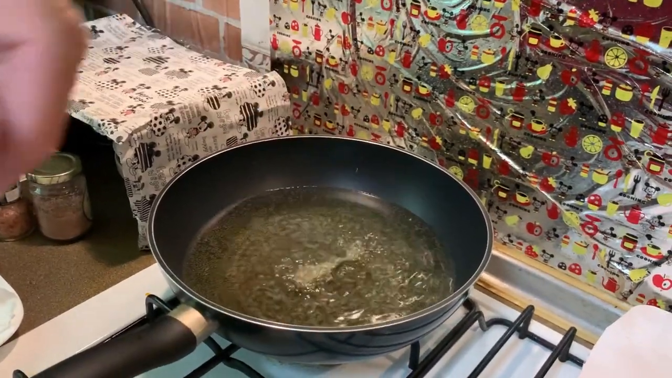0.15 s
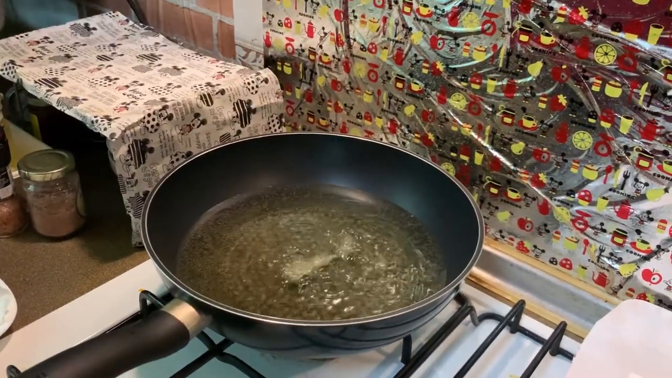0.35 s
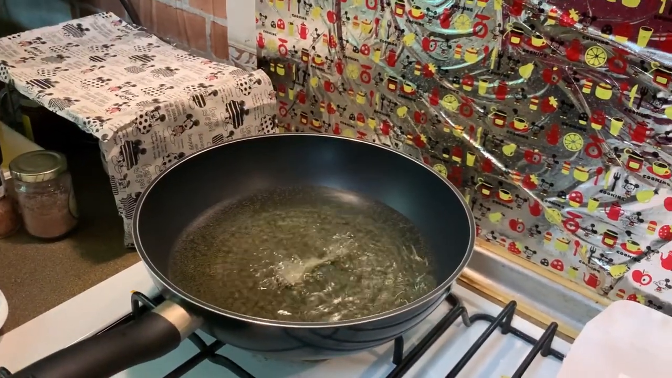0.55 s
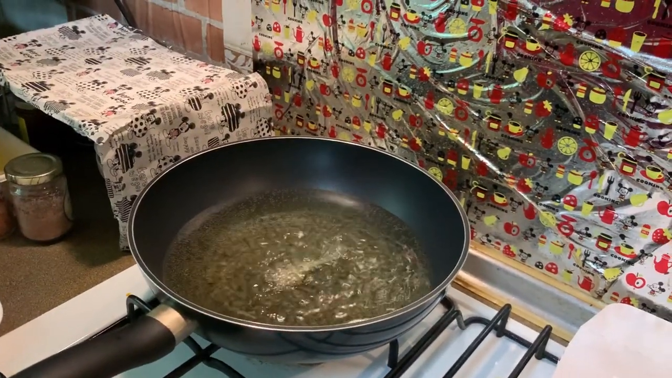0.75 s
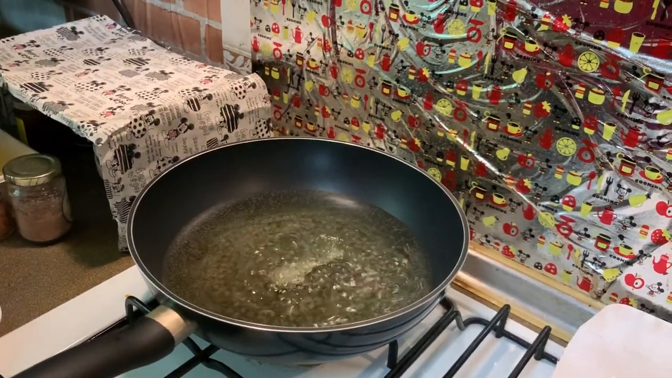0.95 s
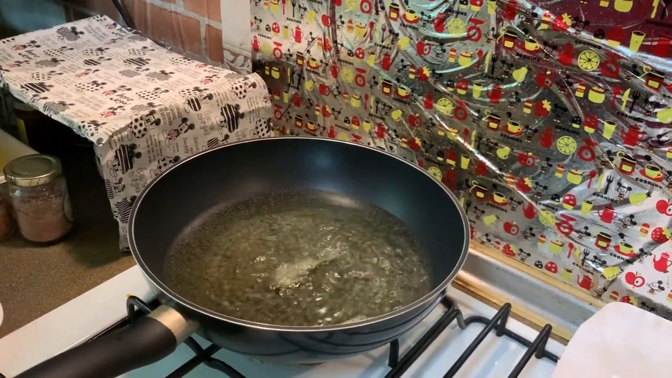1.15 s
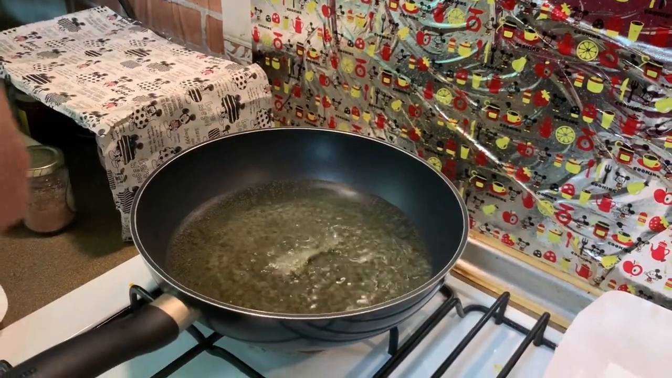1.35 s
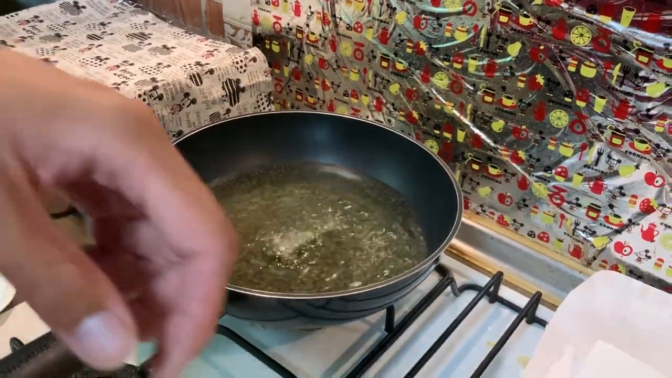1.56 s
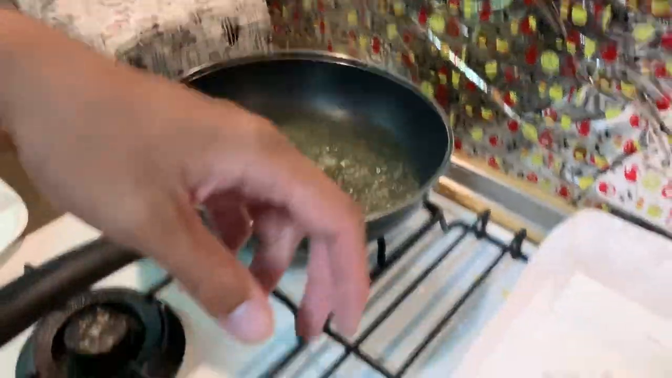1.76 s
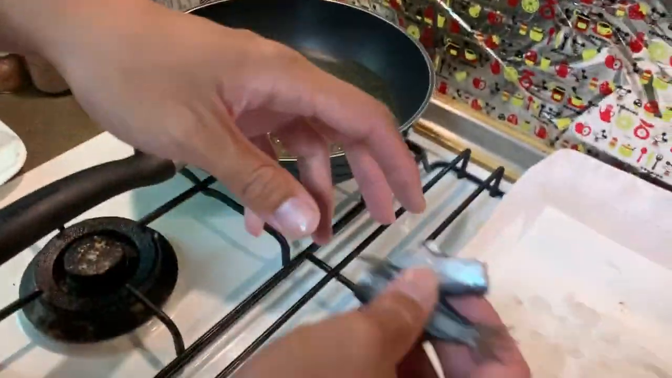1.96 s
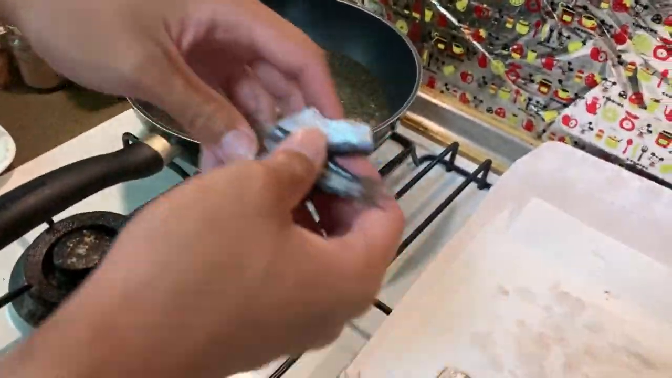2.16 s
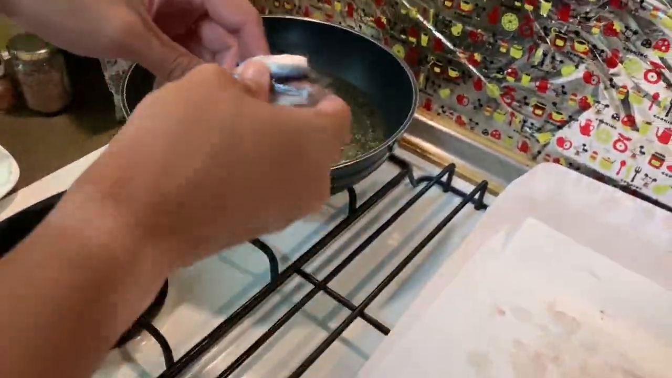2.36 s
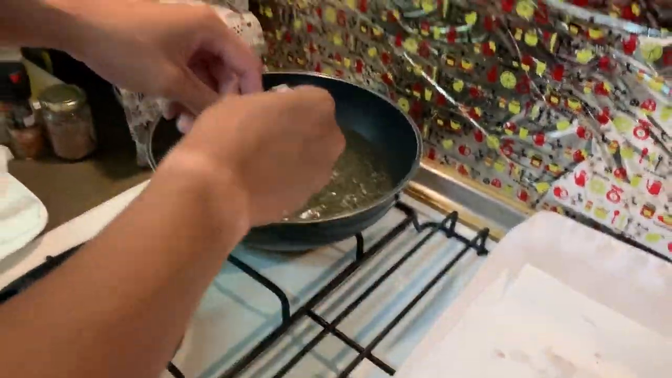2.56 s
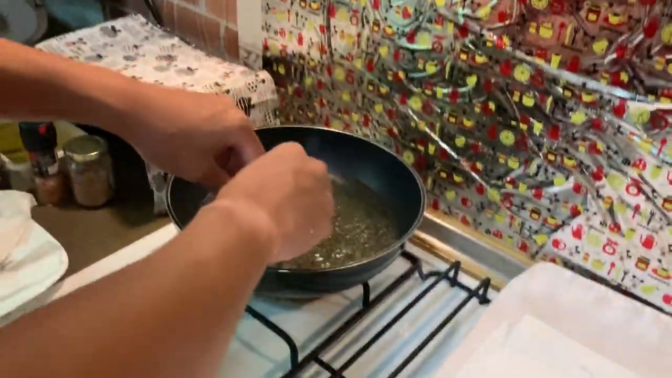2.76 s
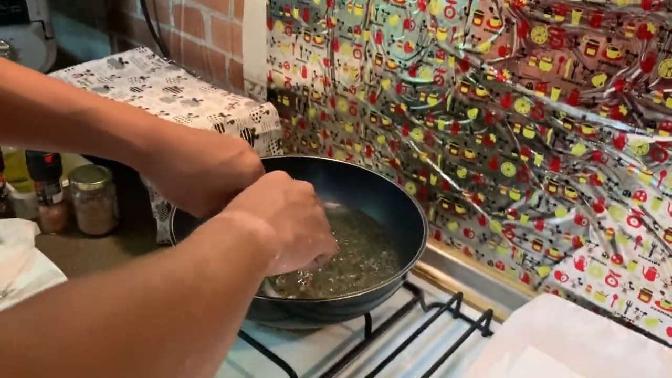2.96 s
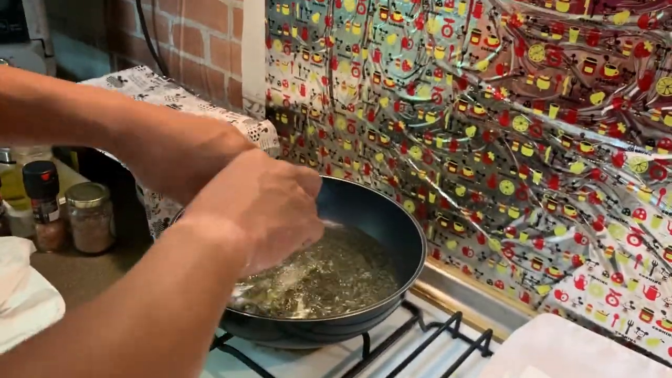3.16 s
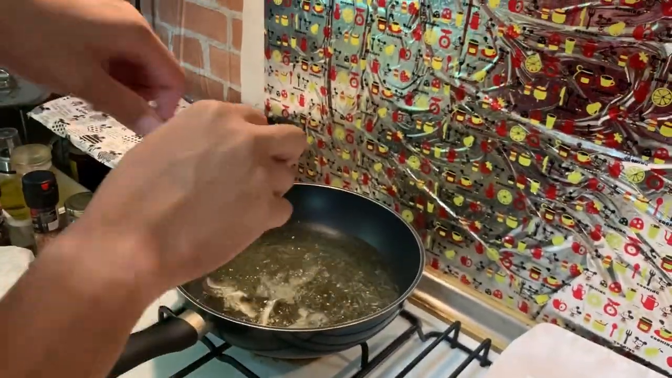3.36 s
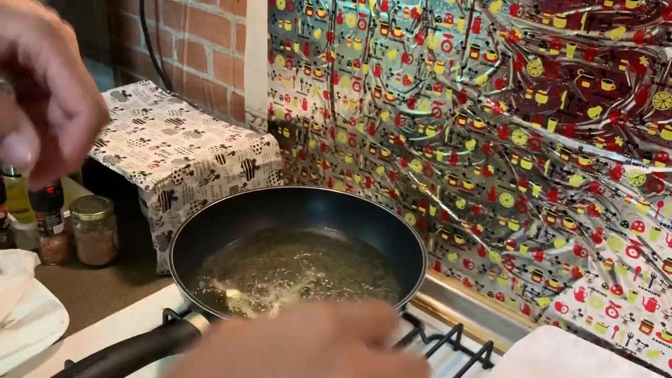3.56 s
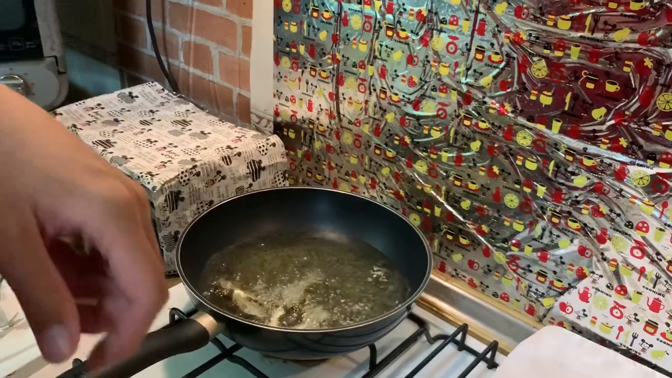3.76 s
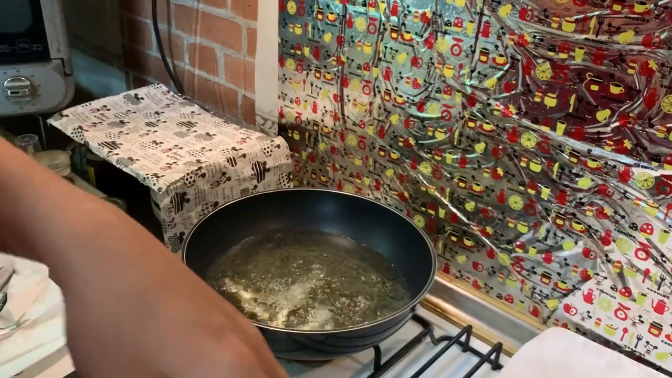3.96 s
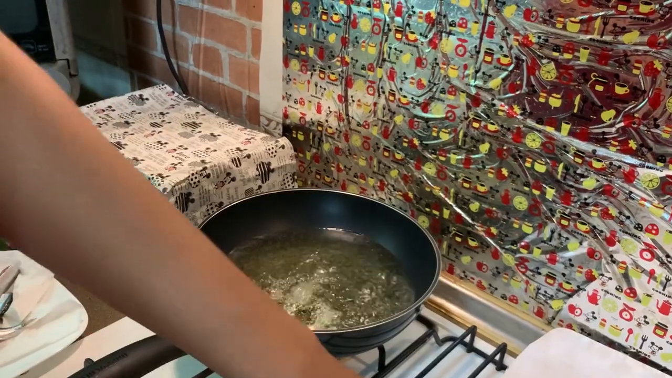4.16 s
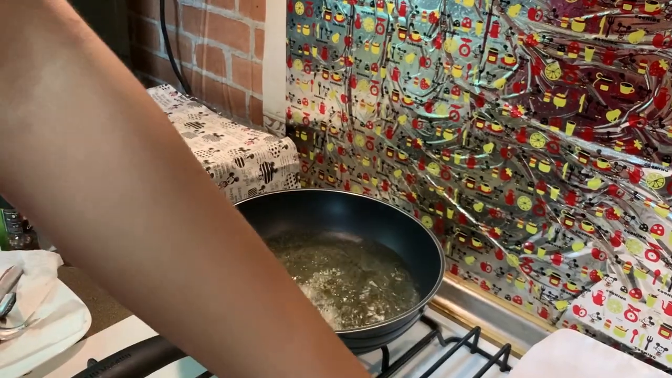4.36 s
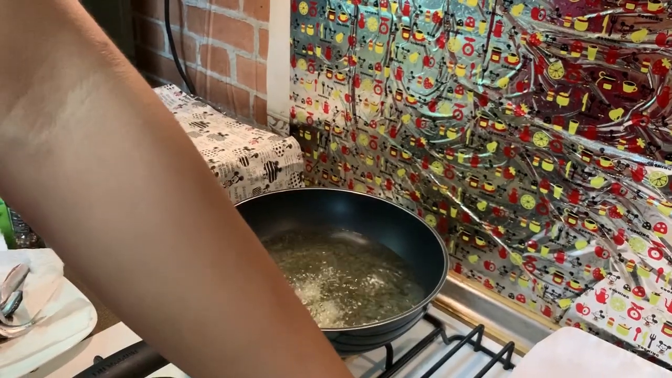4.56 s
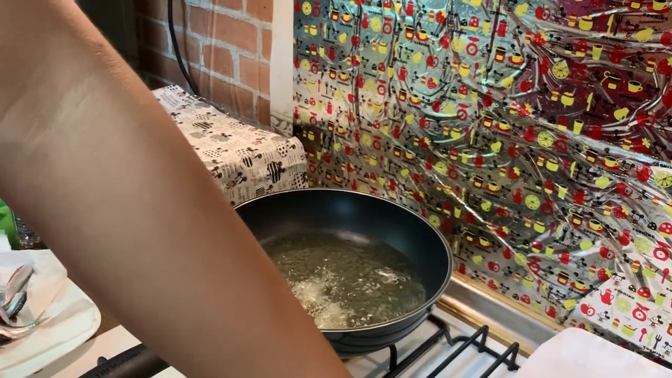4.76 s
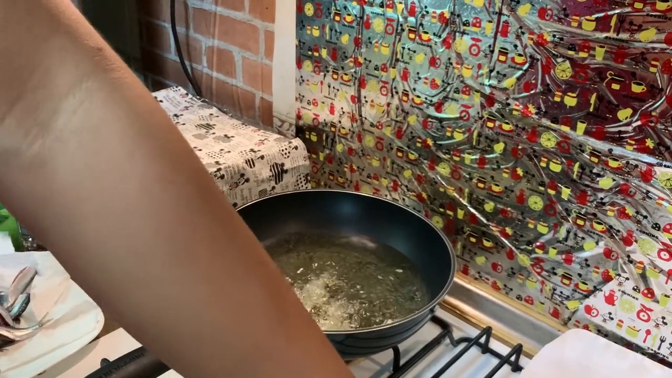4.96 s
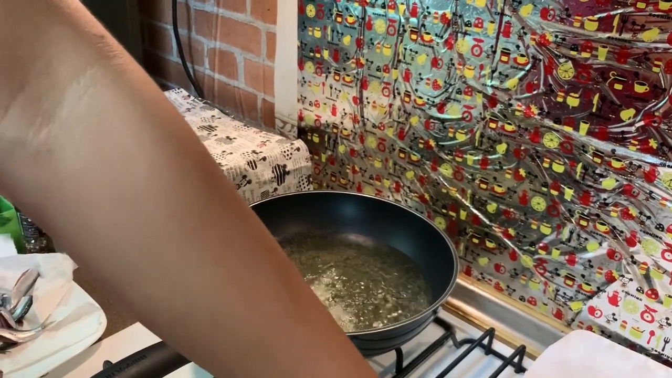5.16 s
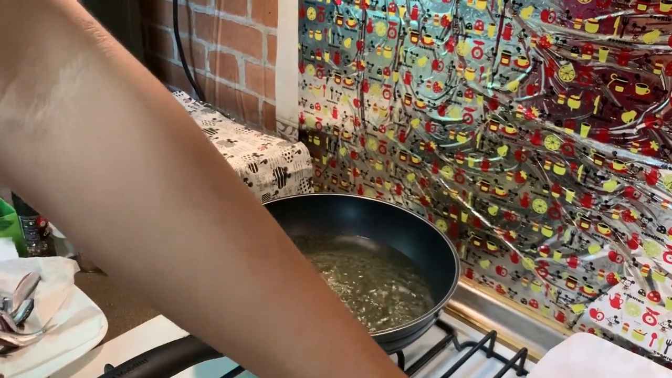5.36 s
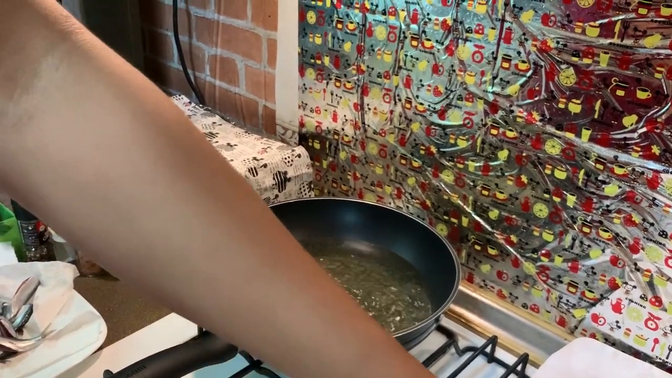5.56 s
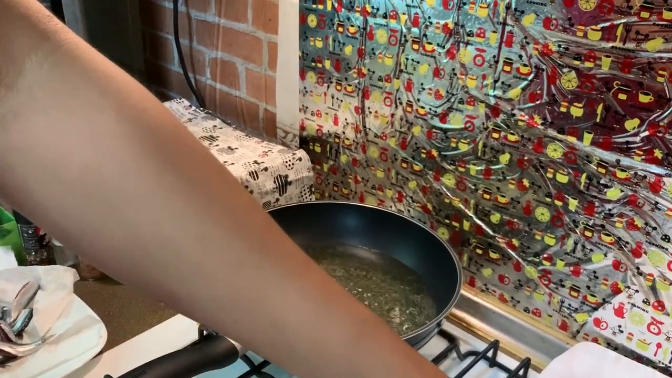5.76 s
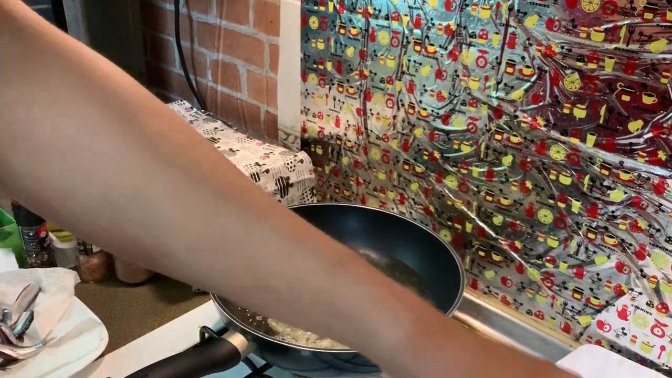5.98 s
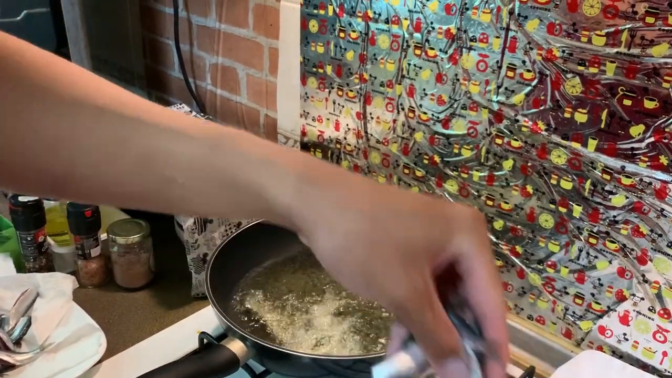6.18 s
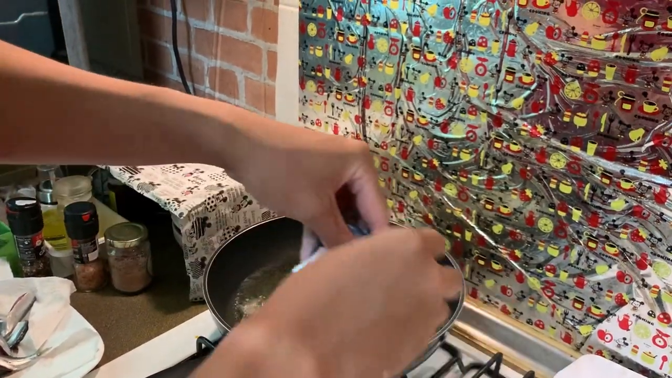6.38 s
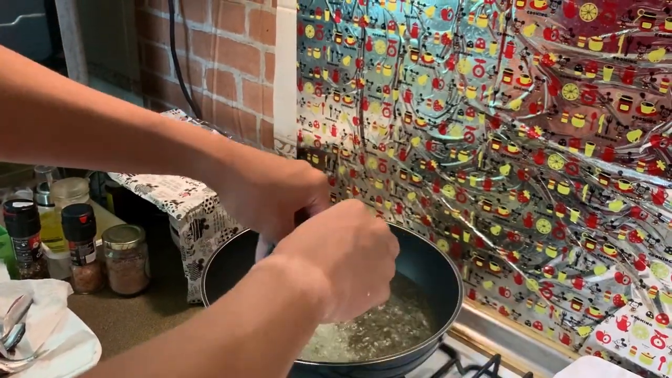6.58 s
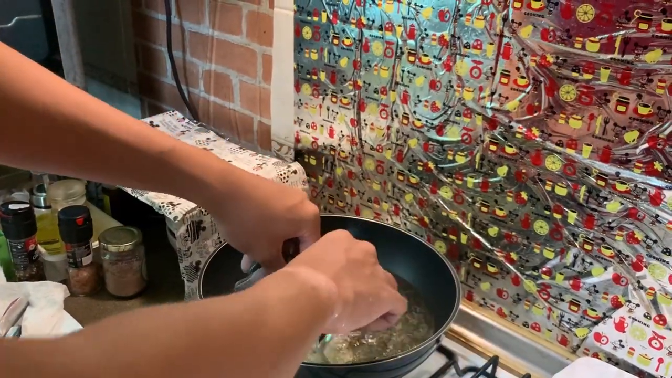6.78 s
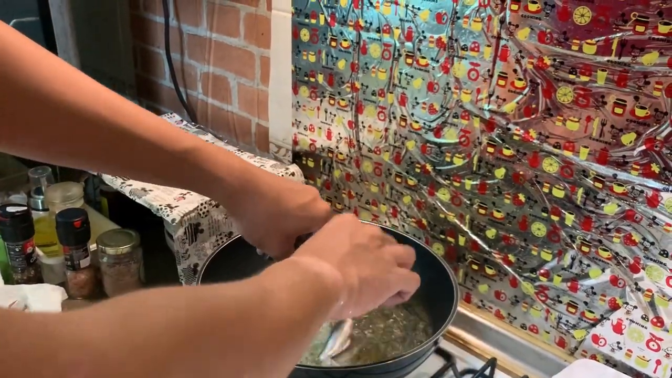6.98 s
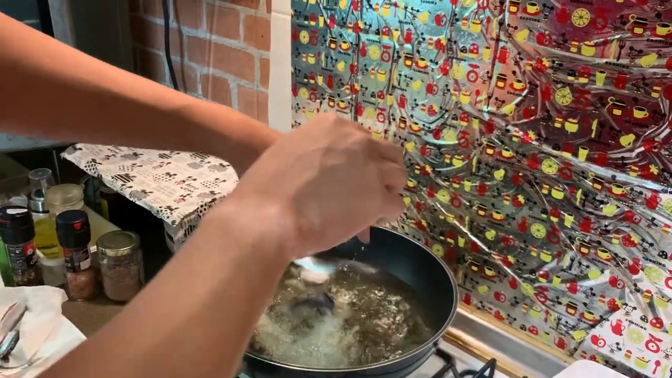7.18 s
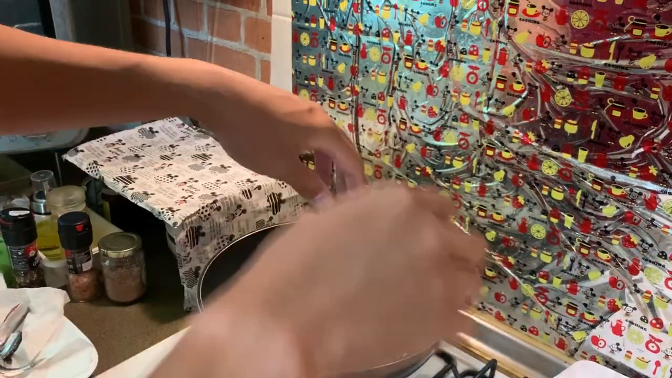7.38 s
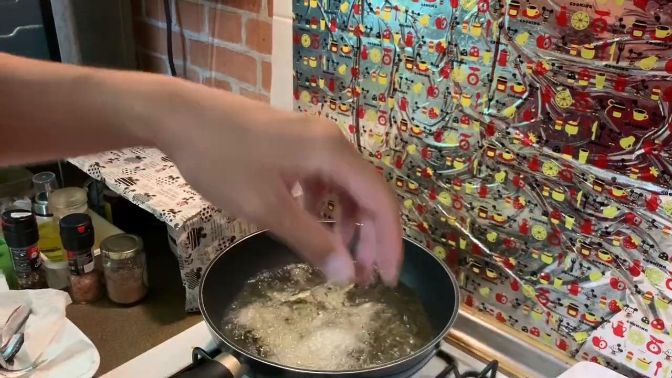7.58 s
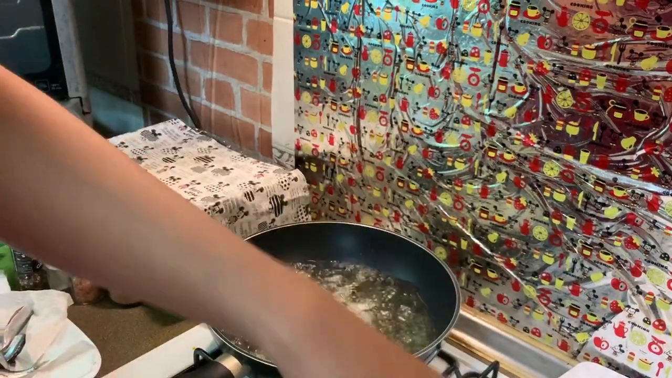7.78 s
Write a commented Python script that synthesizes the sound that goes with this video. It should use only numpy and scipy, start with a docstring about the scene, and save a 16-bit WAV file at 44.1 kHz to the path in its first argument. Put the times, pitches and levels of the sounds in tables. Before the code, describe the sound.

Hot oil fries in a pan on a gas stove, heard from close by in a home kitchen with a short echo. For the first three seconds there is a soft, fine sizzle, dotted with hollow bubbling pops and sharp little spits, easing slightly around 2.5 seconds. At about 3.1 seconds a small wet fish meets the oil, bringing a sudden bright hiss and a cluster of cracks. From 3.5 seconds it settles into frying that is busier than before, with frequent pops; the heaviest faintly ring the pan and give a soft low thump from the grate. At about 6.9 seconds more fish go in and the oil erupts into the loudest, densest sizzling and spitting, peaking between 7.1 and 7.4 seconds and staying strong until the end, near 7.8 seconds. A low rumble of gas flame and kitchen hum continues underneath throughout.

```python
"""Hot oil seethes and fizzes with bright spits and short hollow pops, over a low kitchen hum.
Small fish are frying in a deep pan on a gas ring, close to a microphone with two openings (ports).
Steam pockets burst under the oil and ring the pan; droplets spit as they flash to steam at the surface.
The fine fizz swells whenever fish go in, and tiled walls add a short echo."""
import sys
import numpy as np
from scipy import signal
from scipy.fft import rfft, irfft
from scipy.io import wavfile

SR = 44100
rng = np.random.default_rng(int(sys.argv[2]) if len(sys.argv) > 2 else 0)


def transcribe(u):
    """Save the signal u as a 16-bit wav file named by the first command-line argument.

    u: samples, shape (n,) or (channels, n), limited to [-1, 1]; the rate is SR.
    q: integer samples, one column per channel.
    """
    v = np.clip(np.atleast_2d(u).T, -1, 1)
    q = np.round(v * 32767).astype(np.int16)
    wavfile.write(sys.argv[1], SR, q)


N = 345303
TIME = np.arange(N) / SR
HZ = np.maximum(np.fft.rfftfreq(N, 1 / SR), 1)
CUTOFF_HZ = 16150
# Sounds have two rows: "mid" (what left and right share) and "side" (how they differ).
WHITE = rng.standard_normal((2, 2 * SR))


def from_db(db):
    """Turns decibels into a number to multiply by."""
    return 10 ** (np.asarray(db) / 20)


def rms_one(x):
    """Scales a signal so its average strength (rms) is 1."""
    return x / np.sqrt(np.mean(x ** 2) + 1e-20)


def at_hz(table, column=1):
    """Reads a table at every frequency, joining its rows on an octave scale."""
    table = np.array(table)
    return np.interp(np.log(HZ), np.log(table[:, 0]), table[:, column])


def drift(rate):
    """A smooth random wobble of size about 1; a higher rate wobbles faster."""
    r = np.exp(-80 * np.pi * rate / SR)
    slow = signal.lfilter([1], [1, -2 * r, r * r], rng.standard_normal(N // 40 + 2002))[2000:]
    return np.interp(np.arange(N) / 40, np.arange(len(slow)), rms_one(slow))


def flickering(spectrum, patchy_db, rate, calm_hz):
    """Noise whose octave bands flicker partly together, more gently above calm_hz."""
    noise = rfft(rng.standard_normal((2, N))) * from_db(at_hz(spectrum))
    out, together = 0, drift(rate)
    top_hz = min(spectrum[-1][0], CUTOFF_HZ / 1.5)
    for octave in np.arange(np.log2(spectrum[0][0]), np.log2(top_hz) + 1):
        band = np.cos(np.pi / 2 * np.clip(np.log2(HZ) - octave, -1, 1)) ** 2
        wobble = 4.1 * together + 2.93 * drift(rate)
        out = out + irfft(noise * band, N) * from_db(patchy_db * min(1, calm_hz / 2 ** octave) * wobble)
    return rms_one(out)


def resonate(x, hz, width_hz):
    """Keeps the sound near one pitch by passing it twice through a ringing filter."""
    r, angle = np.exp(-np.pi * width_hz / SR), 2 * np.pi * min(hz, 16000) / SR
    poles = [1, -2 * r * np.cos(angle), r * r]
    return signal.lfilter([1, 0, -1], poles, signal.lfilter([1, 0, -1], poles, x))


def flare(t60, rise_s):
    """Times and loudness shape of a quick rise and a fade; t60 is the seconds to fade by 60 dB."""
    t = np.arange(int(.7 * t60 * SR) + 64) / SR
    return t, (1 - np.exp(-t / rise_s)) * from_db(-60 * t / t60)


def burst(hz, sharpness, t60, rise_s):
    """A puff of noise with peak 1; more sharpness gives it a clearer pitch."""
    t, shape = flare(t60, rise_s)
    start = rng.integers(SR)
    rung = resonate(WHITE[:, start:start + len(t)] * shape, hz, hz / sharpness)
    return rung / np.abs(rung).max()


def add(out, s, sound):
    """Mixes a sound in, starting at s seconds."""
    at = int(np.clip(s * SR, 0, N))
    out[:, at:at + sound.shape[1]] += sound[:, :N - at]


def chance(per_s, level_db, spread_db):
    """Random events, few loud and many faint: (time [s], level [dB], three random numbers [0-1])."""
    draws = rng.random((1000, 5))[:int(per_s * N / SR)]
    at = (draws[:, 0] * N).astype(int)
    size_db = level_db[at] - spread_db * np.log(draws[:, 1] * 0.68 + 0.05)
    return np.c_[at / SR, size_db, draws[:, 2:]]


def seethe(level_db):
    """The hot oil churns with a flickering noise that also rings the pan."""
    # tone colour of the churning oil: (frequency [Hz], relative level [dB])
    spectrum = [(120, -37), (200, 4.5), (265, -18), (335, 11), (474, 2), (601, 2), (708, 3.5), (940, 6.5),
                (1040, 12.5), (1270, 3.5), (1400, 8), (2100, 5.5), (2700, 3), (3400, 1), (5520, -4),
                (7000, -3.5), (9100, -69), (15400, -120)]
    churn = flickering(spectrum, patchy_db=0.8, rate=25, calm_hz=2600)
    return from_db(level_db) * (churn + pan(from_db(-46) * churn))


def pan(force):
    """The pan rings at its own pitches when something shakes it."""
    # ringing notes of the pan and its oil: (pitch [Hz], gain [dB], time to fade by 60 dB [s])
    notes = [(333, -13, 0.072), (353, -5.5, 0.048), (400.4, -15, 0.11), (641.5, -5, 0.076),
             (794, -2.5, 0.11), (1064, -7.5, 0.097), (1414, -12.5, 0.11), (1710, -21, 0.71),
             (1960, -40, 0.056), (2800, -27, 0.073), (3113, 0.5, 0.095)]
    out = 0
    for hz, db, t60 in notes:
        r, angle = from_db(-60 / (t60 * SR)), 2 * np.pi * hz / SR
        poles = [1, -2 * r * np.cos(angle), r * r]
        out = out + signal.lfilter([0, from_db(db) * np.sin(angle)], poles, force + 1e-18)
    return out


def fizz(level_db):
    """The frying gives a fine, high hiss, with one sudden surge."""
    # tone colour of the fizz: (frequency [Hz], relative level [dB])
    spectrum = [(2500, -14.5), (4000, 3.5), (5500, -7), (7000, 2.5), (8600, 8.5), (10500, 0), (12500, 1),
                (14500, -2.5), (16000, 2)]
    return (from_db(level_db) + surge()) * flickering(spectrum, patchy_db=0.5, rate=22, calm_hz=16000)


def flame_and_hum():
    """The gas flame and the kitchen rumble, with a low tone and thin whistles that waver in level."""
    # tone colour of the flame and kitchen: (frequency [Hz], relative level [dB])
    spectrum = [(22, -33), (38, 5), (59, -0.5), (97, 2.5), (161, -5), (268, -7), (332, -6), (403, -6),
                (449, -16), (500, -17), (650, -52), (1100, -120)]
    # loudness of that rumble: (time [s], level [dB])
    levels = [(0, -40), (2.3, -40.5), (3.2, -43), (6, -41.5), (7, -38), (7.83, -38.5)]
    # faint whistles in the sizzle: (pitch [Hz], width [Hz], level [dB])
    whistles = [(5160, 1300, -73), (4915, 83, -58.5), (5340, 90, -60), (7260, 780, -49)]
    low_tone_hz, low_tone_db = 117.6, -51
    roar = irfft(rfft(rng.standard_normal((2, N))) * from_db(at_hz(spectrum)), N)
    out = from_db(np.interp(TIME, *np.transpose(levels)) + 0.35 * drift(5.4)) * rms_one(roar)
    out[0] += from_db(low_tone_db + 3.0 * drift(3.4)) * np.sin(2 * np.pi * low_tone_hz * TIME)
    for hz, width_hz, db in whistles:
        gain = from_db(db + 1.55 * drift(13) + 1.7 * drift(1.6))
        out += gain * rms_one(resonate(rng.standard_normal((2, N)), hz, width_hz))
    return out


def spits(fizz_db):
    """Droplets flash to steam: small ones crack, tiny ones tick, large ones crack and hiss."""
    # the louder droplets: (time [s], base level [dB], pitch [Hz])
    droplets = [(0.018, -15.5, 5560), (0.1331, -22.5, 10400), (0.2005, -12.5, 9900), (0.52, -21, 5400),
                (0.5538, -17.5, 11500), (0.688, -22.5, 9900), (0.88, -27, 5400), (0.968, -26, 5360),
                (1.044, -23.5, 8300), (1.091, -24.5, 6700), (1.1498, -24.5, 11900), (1.297, -26, 11400),
                (1.374, -21.5, 10100), (1.5985, -19.5, 4930), (1.635, -22, 5860), (1.7355, -24, 12600),
                (1.883, -28, 9400), (2.0712, -26, 10400), (2.128, -21.5, 9100), (2.275, -29, 10500),
                (2.322, -29, 7160), (2.384, -19.5, 5000), (2.9362, -26, 9720), (2.975, -21, 6760),
                (3.052, -20, 6900), (3.1378, -12.5, 11500), (3.148, -19, 6960), (3.174, -12, 6460),
                (3.1847, -7, 15000), (3.2, -10, 11100), (3.216, -5.5, 15500), (3.311, -11, 11900),
                (3.322, -13, 7500), (3.37, -13.5, 9200), (3.451, -20, 4730), (3.5697, -17.5, 7200),
                (3.6566, -28, 10700), (3.694, -21.5, 11100), (3.7155, -25, 10200), (3.7514, -27, 9650),
                (3.8442, -27, 10400), (3.9759, -30, 4540), (4.0582, -19.5, 7750), (4.235, -21, 6360),
                (4.295, -18, 6900), (4.3212, -13.5, 8900), (4.4513, -22, 6730), (4.6998, -24, 5190),
                (4.801, -28, 5730), (4.8888, -24, 7290), (5.126, -20.5, 4830), (5.221, -20.5, 11700),
                (5.2694, -28, 14800), (5.245, -23, 7000), (5.317, -28, 14800), (5.335, -22, 4600),
                (5.3926, -21, 12000), (5.414, -15.5, 8800), (5.424, -21, 4700), (5.4974, -23, 6920),
                (5.5288, -23, 11500), (5.57, -20, 7060), (5.6032, -24, 4510), (5.688, -25, 10300),
                (5.777, -25, 11900), (5.8586, -26, 5570), (5.943, -28, 11200), (6.0636, -26, 9730),
                (6.078, -15.5, 6960), (6.1795, -16, 11900), (6.257, -17.5, 6900), (6.436, -19, 11900),
                (6.673, -18, 11400), (6.859, -14.5, 10300), (6.987, -18, 7240), (7.0394, -16, 11600),
                (7.06, -2.5, 8800), (7.124, -4, 15100), (7.225, -11, 6040), (7.3, -4.5, 10400),
                (7.3375, -3.5, 7600), (7.428, -10, 8000), (7.5077, -10.5, 11700), (7.593, -15, 7450),
                (7.7284, -19, 5100), (7.7459, -18, 6800), (7.7895, -10.5, 7760)]
    out = np.zeros((2, N))
    for s, db, pitch, length, _ in chance(per_s=22, level_db=fizz_db + 6.0, spread_db=1.0):   # small
        add(out, s, from_db(db) * burst(4200 * 3.66 ** pitch, 6.8, 0.023 + 0.048 * length, 0.00043))
    for s, db, pitch, length, _ in chance(per_s=45, level_db=fizz_db + 1.5, spread_db=2.5):   # tiny
        add(out, s, from_db(db) * burst(5500 * 2.78 ** pitch, 7.4, 0.01 + 0.017 * length, 0.0003))
    for s, db, hz in droplets:
        add(out, s, from_db(db - 2.5) * burst(hz, 3.0, 0.052, 0.0003))
        # the broad hiss grows faster with size than the crack does
        add(out, s, from_db(1.25 * db + 3.5) * burst(5800, 0.25, 0.027, 0.00015))
    return out


def kitchen_echo(x):
    """Tiled walls send back a short echo, duller than the sound itself."""
    t60 = 0.28
    t = np.arange(int(t60 * SR)) / SR
    tail = rng.standard_normal((2, SR // 2))[:, :len(t)] * from_db(-60 * t / t60) * (t > .004)
    tail = signal.lfilter([.3], [1, -.7], tail)   # softens the treble
    tail = tail / np.sqrt(np.sum(tail ** 2, axis=1, keepdims=True))
    return signal.fftconvolve(x, tail, axes=1)[:, :N]


def bubble(hz, t60, rise_s):
    """A steam pocket's tone sinks a little as it swells, and throbs against a neighbour."""
    t, shape = flare(t60, rise_s)
    cycles = np.cumsum(hz * 2 ** (-.06 * (t / t60 * 4 - .5).clip(max=1))) / SR
    throb = 1 + 0.44 * np.sin(2 * np.pi * (rng.uniform(93, 248) * t + rng.random((2, 1))))
    return np.sin(2 * np.pi * (cycles + rng.random((2, 1)))) * throb * shape / shape.max()


def pops(seethe_db):
    """Steam pockets burst with a tone, a splash and three overtones, and thump the pan and its grate."""
    # the louder pockets: (time [s], base level [dB], pitch [Hz], overtone offset [dB], thud offset [dB])
    large = [(0.058, -13.5, 1563, 0, -10.5), (0.168, -11, 945, -25, -6), (0.205, -14, 1290, -31, -8),
             (0.321, -24, 1200, -6, -4), (0.376, -11.5, 936, 2.5, 1.5), (0.436, -27.5, 2170, -3, -25),
             (0.496, -11.5, 806, 4.5, -5), (0.546, -25, 1640, -5, -17), (0.575, -24.5, 1200, -12, -6),
             (0.625, -22.5, 1480, 1, -16), (0.936, -14.5, 863, -1.5, -8), (0.964, -19.5, 1555, -27, -8),
             (1.122, -19, 1700, -11, -2), (1.179, -27, 950, -10, -2), (1.208, -14, 677, -2, -12),
             (1.214, -29, 2400, -15, -20), (1.291, -25, 1745, -3, -20), (1.454, -18.5, 760, -3, 1.5),
             (1.539, -21, 704, -1.5, -5), (1.939, -7.5, 947, -4.5, -22), (1.998, -21, 1070, -21, -22),
             (2.06, -9, 960, -11, -8), (2.066, -15, 367, -25, 3.5), (2.19, -23, 960, -24, -2),
             (2.317, -18.5, 870, -13, -6), (2.338, -12, 1028, -2.5, -5), (2.442, -27, 1074, 4, -12),
             (2.491, -26.5, 805, -5, -3), (2.54, -35, 797, -13, -8), (2.636, -35, 1480, -6, -15),
             (2.845, -17.5, 1120, 6, -8.5), (2.9, -23, 1097, 1, -4), (2.955, -26, 1450, -13, -6),
             (3.01, -31, 2170, -10, -20), (3.052, -15.5, 2950, -18, -31), (3.079, -16.5, 1890, -18, -7),
             (3.101, -20.5, 392, -20, -14), (3.145, -13, 1970, -2, -25), (3.187, -9.5, 1620, -21, -33),
             (3.237, -11.5, 1107, 6.5, -30), (3.272, -8.5, 1016, -28, -18), (3.283, -12.5, 708, -20, -31),
             (3.309, -8.5, 1213, -16, -13), (3.439, -15.5, 2050, -22, -31), (3.512, -18, 2460, -10, -19),
             (3.626, -18, 1416, -17, -2), (3.659, -29, 2250, -12, -21), (3.75, -18, 1150, -22, -1.5),
             (3.782, -14, 1333, 0, -29), (3.871, -16.5, 1053, -19, -2.5), (3.94, -18, 1550, -10, -20),
             (3.975, -8, 1023, -5, -11), (3.983, -13.5, 1700, -20, -25), (4.043, -12.5, 1080, -21, -13),
             (4.068, -11, 870, -26, -1.5), (4.133, -22, 1050, -15, -15), (4.141, -16.5, 350, -25, -6),
             (4.166, -9.5, 354, -3, -20), (4.234, -5, 350, -12, -14), (4.247, -9, 1110, -6, -7),
             (4.265, -19.5, 1090, 4, -10), (4.349, -20, 1050, -4, -5), (4.405, -24, 1610, -15, -20),
             (4.451, -18.5, 3220, 0, -27), (4.479, -14.5, 1515, 1.5, -26), (4.484, -26, 340, -25, 6),
             (4.533, -23, 1096, -6, -18), (4.555, -23, 370, -5, -8), (4.582, -22.5, 1040, -19, -7),
             (4.675, -20.5, 2530, -12, -1), (4.693, -10.5, 614, 0, -5.5), (4.699, -16, 1740, -3, -25),
             (4.72, -6.5, 1555, -29, -29), (4.775, -10.5, 2503, -1.5, -9), (4.801, -16.5, 1040, 3, -34),
             (4.896, -26, 3380, -6, -27), (4.908, -17, 713, -9, -2.5), (4.923, -22, 2145, -18, -27),
             (5.067, -19, 2164, 5.5, -41), (5.225, -18, 620, 5.5, -4), (5.301, -13.5, 1097, -5, -11),
             (5.326, -13.5, 1944, -4, -4), (5.424, -18.5, 596, 4, 0.5), (5.478, -12.5, 1860, 1, -10),
             (5.495, -10.5, 1416, -15, -7), (5.533, -15.5, 2170, -9, -15), (5.586, -11.5, 1028, -30, -1.5),
             (5.604, -11.5, 1900, -22, -6), (5.61, -12.5, 632, 4.5, -8), (5.7, -14.5, 1007, 1, -5),
             (5.796, -16, 1087, -9, 2), (5.877, -18.5, 967, -3, -21), (5.886, -19.5, 344, -25, 1),
             (6.059, -17.5, 1027, 5, -8), (6.18, -21, 1910, 3, -23), (6.256, -16.5, 2240, -12, -29),
             (6.334, -19.5, 2750, 2, -23), (6.379, -17.5, 1740, -15, -25), (6.42, -22, 1410, -16, 7.5),
             (6.465, -12.5, 1088, 4.5, -1), (6.482, -12, 1104, -1, -4), (6.578, -18.5, 350, 1, -10),
             (6.639, -26, 1160, 9, 12.5), (6.772, -12, 2026, -3, -10), (6.858, -7.5, 1066, -7, -10),
             (6.873, -12.5, 710, -4, -13), (6.886, -18, 480, -11, 8), (6.919, -16.5, 2730, 0, -0.5),
             (6.944, -12, 1870, -11, -13), (6.95, -14.5, 353, -20, -3), (6.957, -13.5, 2100, 1, -23),
             (6.99, -27, 795, 0, -20), (7.008, -11, 1946, -6, -20), (7.043, -17, 1685, -10, -18),
             (7.061, -9, 2080, 0, -32), (7.113, -21, 940, 2, -15), (7.115, -18, 340, -20, -10),
             (7.134, -17, 1135, 6, -24), (7.148, -12, 1067, 1, -29), (7.158, -9, 1060, -15, -25),
             (7.174, -4.5, 1960, -22, -13), (7.198, -9, 1890, 1, -25), (7.206, -15.5, 346, -20, -8),
             (7.208, -15, 1054, 6, -25), (7.243, -4, 1400, -15, -8.5), (7.257, -9, 2950, -16, -27),
             (7.259, -19, 345, -20, -8), (7.286, -13, 1335, -8, -25), (7.29, -11.5, 354, -20, -7),
             (7.301, -7, 2000, -10, -10), (7.31, -13, 580, -20, -16), (7.33, -15, 1770, 8, -20),
             (7.363, -14.5, 2060, -8, -22), (7.378, -16, 980, -10, -15), (7.387, -11, 2670, -15, -25),
             (7.395, -19, 343, -20, -5), (7.409, -18, 345, -18, -4), (7.426, -4.5, 2300, -22, -34),
             (7.469, -8, 1920, -15, -22), (7.524, -13, 2110, 7, -5), (7.571, -12.5, 1785, 3, -22),
             (7.583, -24, 380, -25, 12.5), (7.642, -11, 972, 7, -16), (7.654, -9.5, 340, 3, -12),
             (7.692, -13.5, 1200, 6, -9), (7.749, -9, 1025, -25, -10), (7.775, -15, 334, -22, -14),
             (7.791, -5, 1106, 3, -31)]
    # the stove grate booms under the heaviest bursts: (time [s], level [dB])
    booms = [(1.213, -28), (4.235, -27), (4.693, -34), (5.601, -33), (6.465, -33), (6.86, -32),
             (7.655, -36)]
    tone_db, crack_db, crack_lead_s, grate_hz = -6.5, -9.5, 0.002013, 126.6
    small = [(s, db, 600 * 4.6 ** pitch, -18 + 14 * bright, -22 + 16 * heavy)
             for s, db, pitch, bright, heavy in chance(per_s=52, level_db=seethe_db + 6.0, spread_db=2.0)]
    air, thump = np.zeros((2, N)), np.zeros((2, N))
    for pockets, t60, splash_db in [(large, 0.056, -4), (small, 0.055, -15)]:   # small ones splash less
        for s, db, hz, overtone_db, thud_db in pockets:
            add(air, s, from_db(db + tone_db) * bubble(hz, t60, 0.00074))
            splash = burst(0.97 * hz, max(1.31, 1100 / hz), 0.77 * t60, 0.0011)
            add(air, s, from_db(db + splash_db) * splash)
            octaves_up = 0.85 * (np.arange(3) + rng.random(3)) / 3
            for overtone_hz in 1297.7 * (hz / 1000) ** 0.4 * 2 ** octaves_up:
                add(air, s, from_db(db + overtone_db - 14) * bubble(overtone_hz, 1.13 * t60, 0.00066))
            add(thump, s, from_db(db + thud_db) * burst(393.0, 1.46, 0.02, 0.0012))
    for s, db, hz, _, thud_db in large:
        if hz > 500:   # all but the deepest crack open just before they burst
            crack = burst(min(1.14 * hz, 2200), 0.71, 0.029, 0.00075)
            add(air, s - crack_lead_s, from_db(db + crack_db) * crack)
        add(air, s, from_db(db + thud_db - 19.5) * burst(grate_hz, 1.0, 0.075, 0.0024))
    for s, db in booms:
        add(air, s, from_db(db) * bubble(grate_hz, t60=0.24, rise_s=0.0013))
    return air + pan(from_db(-37.5) * thump + from_db(-49.5) * air)


def surge():
    """A wet fish meets the oil: extra gain for the fizz that shoots up, holds briefly and drops."""
    peak_s, peak_db, hold_s = 3.18, -23, 0.03
    rise_db_per_s, fall_db_per_s = 600, 800
    t = TIME - peak_s
    return from_db(peak_db - rise_db_per_s * (-t).clip(0) - fall_db_per_s * (t - hold_s).clip(0))


def scene():
    """Mixes all the sounds, then turns mid and side into the left and right ports."""
    # how hard the oil fries: (time [s], seethe level [dB], fizz level [dB])
    vigour = [(0.0, -38.5, -42), (1.87, -41, -44.5), (2.29, -39.5, -47.5), (2.66, -44.5, -48.5),
              (2.93, -38.5, -44), (3.0, -45, -36), (3.14, -29, -28.5), (3.23, -26, -30.5),
              (3.49, -33.5, -37), (4.12, -33.5, -37.5), (5.01, -33.5, -41), (5.54, -33, -38.5),
              (6.83, -30, -39), (6.89, -24, -33), (7.03, -28, -26), (7.1, -25.5, -21), (7.22, -21.5, -23.5),
              (7.45, -23, -26.5), (7.83, -25.5, -28.5)]
    # what the two ports hear: (frequency [Hz], left-right likeness [0-1], left over right [dB])
    ports = [(40, 0.88, -4), (360, 0.94, -1.5), (620, 0.11, -0.3), (1050, 0.52, -2), (1930, 0.26, -0.5),
             (4830, 0.069, -3), (6000, 0.043, -2.5), (8150, 1, 0.5), (16000, 0.68, -0.5)]
    times, *levels = np.transpose(vigour)
    seethe_db, fizz_db = [np.interp(TIME, times, level) for level in levels]
    events = pops(seethe_db) + spits(fizz_db)
    sizzle = seethe(seethe_db) + fizz(fizz_db)
    mid, side = rfft(events + from_db(-12.5) * kitchen_echo(events) + sizzle + flame_and_hum())
    alike = np.clip(at_hz(ports), 0, 1)
    mid, side = np.sqrt((1 + alike) / 2) * mid, np.sqrt((1 - alike) / 2) * side
    lean = from_db(at_hz(ports, column=2) / 2)
    return irfft(np.array([(mid + side) * lean, (mid - side) / lean]), N)


def record(dry):
    """Treble reaches the right port first; deep bass is cut, peaks are rounded, the very top is cut."""
    lead_s, lead_from_hz = 0.00022, 6253
    lead = np.exp(2j * np.pi * lead_s * np.maximum(HZ - lead_from_hz, 0))
    at_ports = np.array([dry[0], irfft(rfft(dry[1]) * lead, N)])
    bass_cut = signal.sosfilt(signal.butter(8, 38, "high", fs=SR, output="sos"), at_ports)
    rounded = 1.3 * np.tanh(bass_cut / 1.3)
    return signal.sosfilt(signal.cheby2(20, 60, CUTOFF_HZ, fs=SR, output="sos"), rounded)


dry = scene()
out = record(dry)
transcribe(out)
```